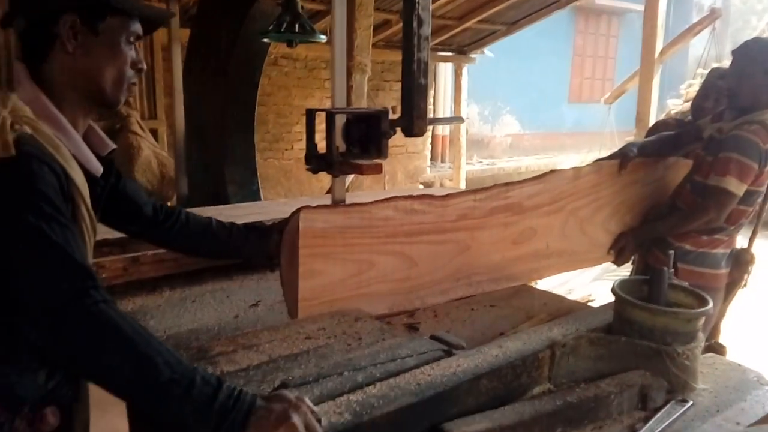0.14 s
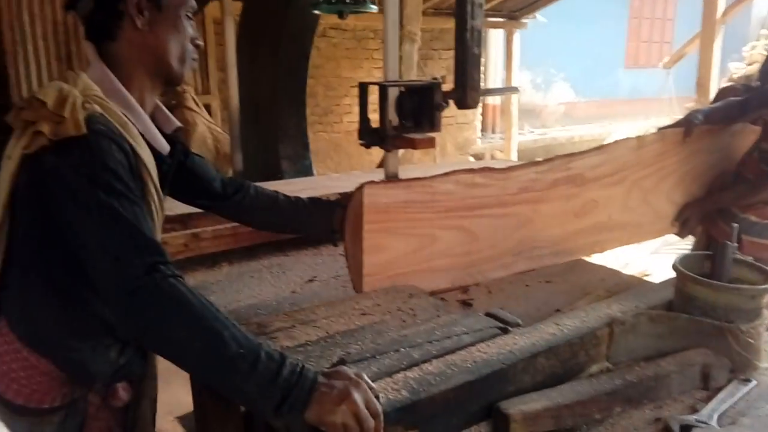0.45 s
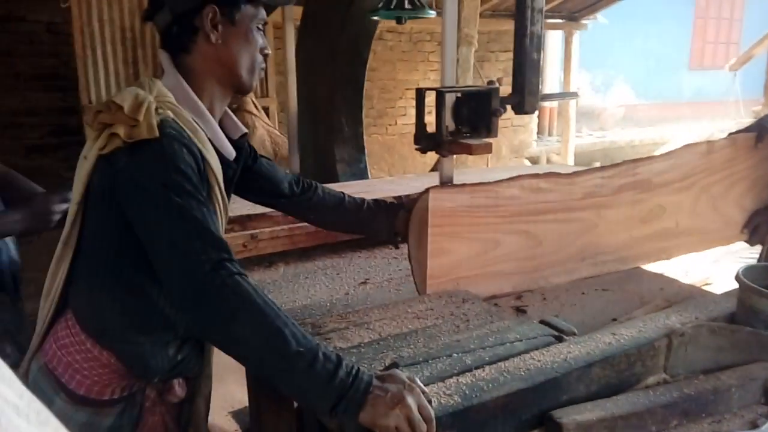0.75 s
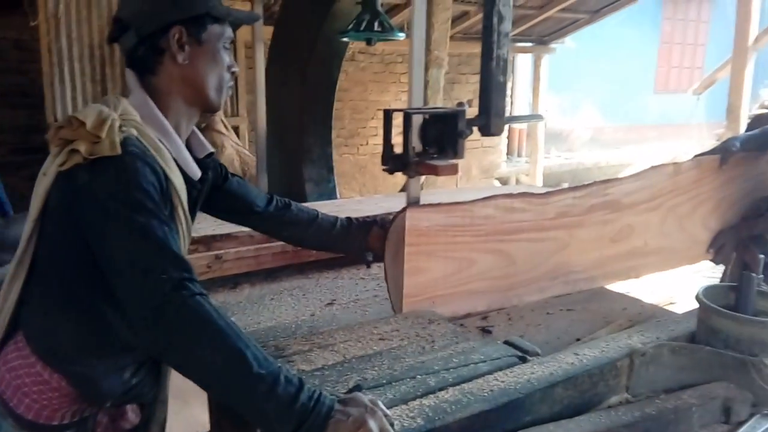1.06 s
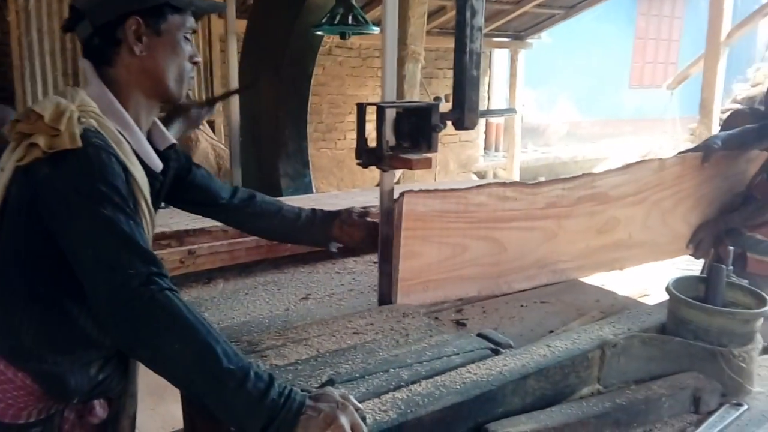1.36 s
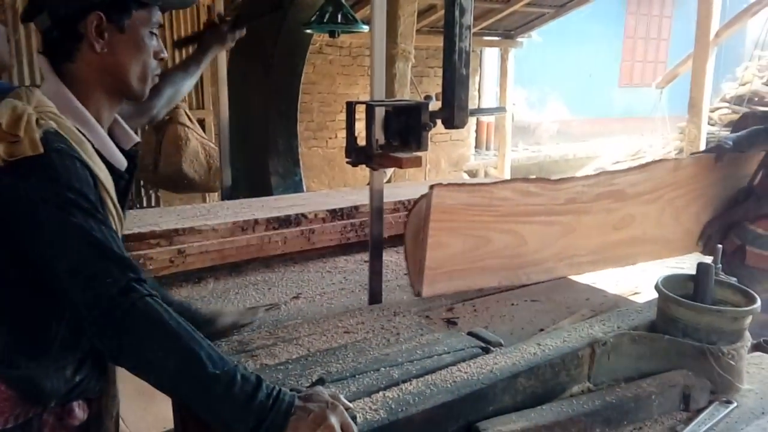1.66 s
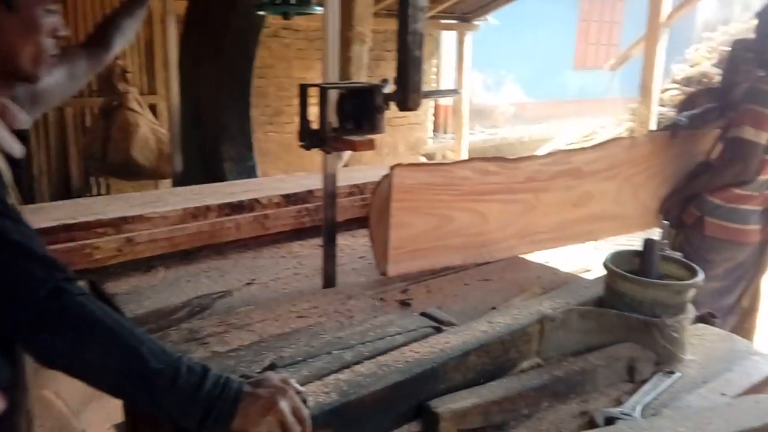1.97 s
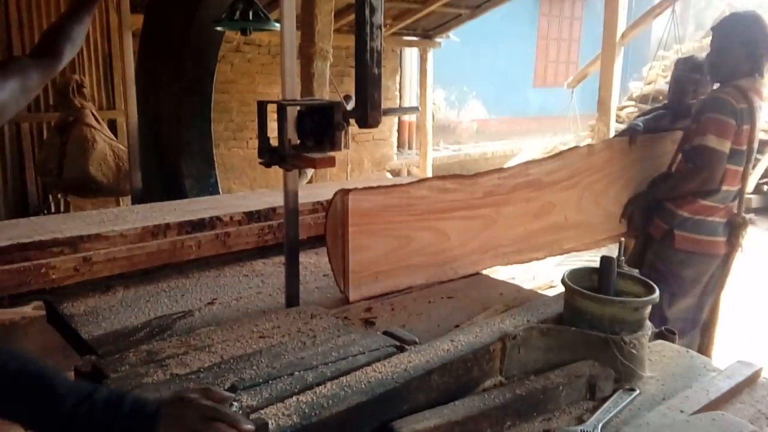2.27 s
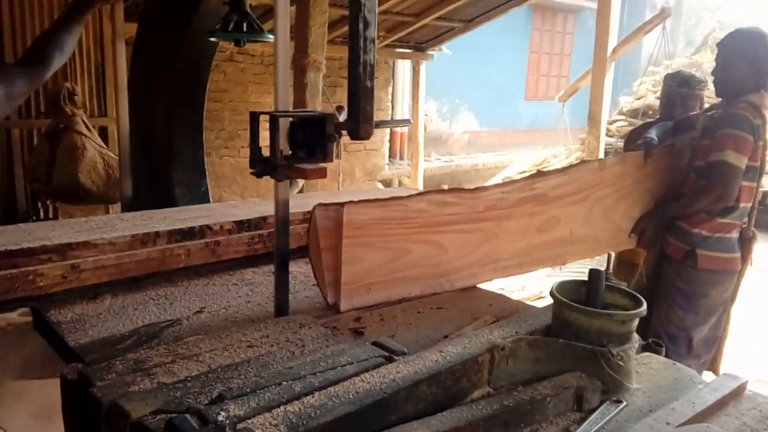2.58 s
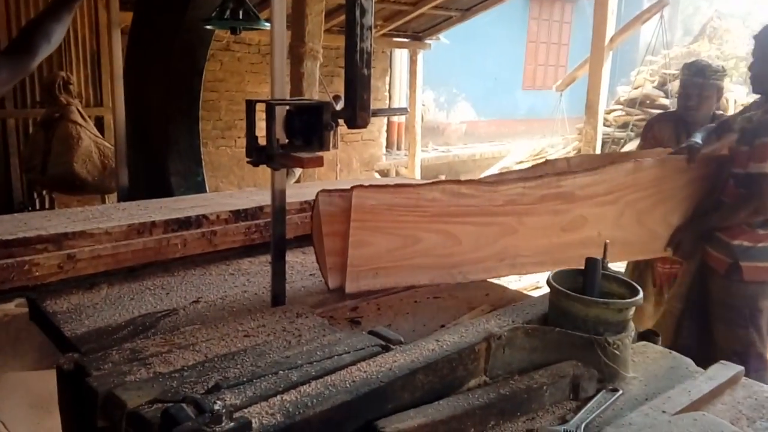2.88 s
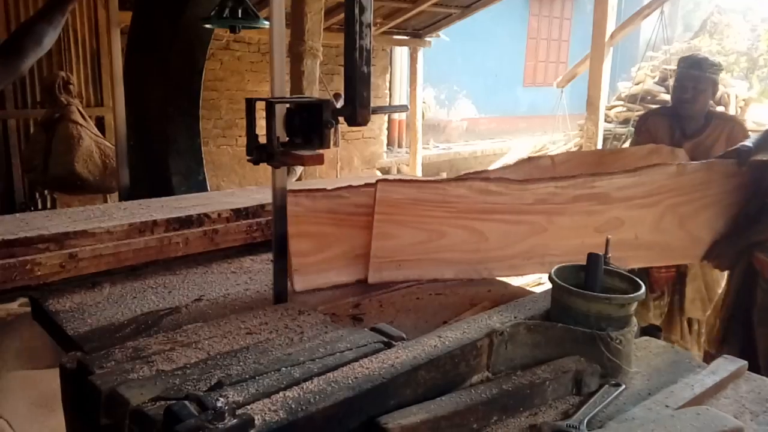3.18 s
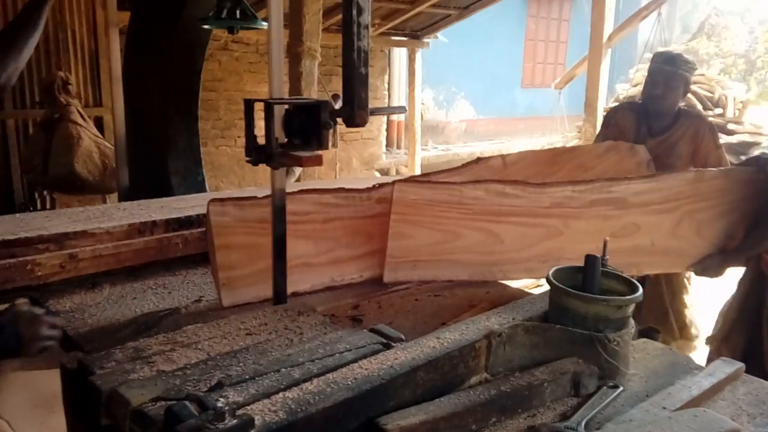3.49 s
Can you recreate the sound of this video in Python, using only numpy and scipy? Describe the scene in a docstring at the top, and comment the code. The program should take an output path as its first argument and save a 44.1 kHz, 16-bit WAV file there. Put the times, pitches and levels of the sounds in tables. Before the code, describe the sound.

Band saw close by: steady bright metallic hiss and wavering high whine, with sawdust fizz stopping early.

```python
"""In an open sawmill shed, a large band saw runs close by. Its steel band scrapes through the guides with a loud hiss,
made of shaped noise, and rings in narrow whines (narrow bands of noise) and wavering notes (sine tones).
Until 1.3 s the teeth rip a slab: this adds sawdust fizz and a low drone, and damps some of the ringing while it
strengthens other parts. Then the band runs nearly free: a slight bite creeps in, peaks at 3.2 s and soon ends."""
import sys
import numpy as np
from scipy import signal
from scipy.fft import rfft, irfft, next_fast_len
from scipy.io import wavfile
from scipy.ndimage import uniform_filter1d, map_coordinates

SR = 44100
rng = np.random.default_rng(int(sys.argv[2]) if len(sys.argv) > 2 else 0)


def digitize_waveform(pressure):
    """Quantize a signal to 16-bit integers and store it at the path in sys.argv[1].

    Rows of a 2-D input are taken as channels; values are limited to [-1, 1].
    """
    field = np.atleast_2d(pressure).T
    bounded = np.clip(field, -1, 1)
    quanta = np.round(bounded * 32767).astype(np.int16)
    wavfile.write(sys.argv[1], SR, quanta)


N = 160965  # samples, about 3.65 s


def amp(db):
    """Turn decibels into a plain multiplier."""
    return 10 ** (np.asarray(db) / 20)


def unit(x):
    """Scale a signal to an average strength (rms) of 1."""
    return x / np.sqrt(np.mean(x ** 2) + 1e-20)


def curve(rows):
    """Join (time, value) points with straight lines, one value per sample."""
    return np.interp(np.arange(N) / SR, *np.transpose(rows))


def wobble(rate):
    """A smooth random curve through rate random points a second."""
    return map_coordinates(rng.standard_normal(1024), [np.arange(N) * rate / SR], mode="wrap")


def filtered(x, response):
    """Make each frequency of x stronger or weaker, as the response says."""
    padded = next_fast_len(N + 8192)  # silence at the end keeps the filter's tail off the start
    spectrum = rfft(x, padded) * response(np.fft.rfftfreq(padded, 1 / SR))
    return irfft(spectrum, padded)[:N]


def noise(spectrum, patchy_db):
    """Noise of rms 1 with a given spectrum and narrow, brief patches of random loudness."""
    grid = signal.stft(rng.standard_normal(N), nperseg=2048)[2]
    patches = uniform_filter1d(rng.standard_normal(grid.shape), size=3, axis=0)  # spread over pitch
    patches = uniform_filter1d(patches, size=4, axis=1)  # spread over time
    patchy = signal.istft(grid * amp(patchy_db * unit(patches)), nperseg=2048)[1][:N]
    f, db = np.transpose(spectrum)
    return unit(filtered(patchy, lambda hz: amp(np.interp(np.log(hz + 1), np.log(f), db))))


def ringing(hz, width_hz):
    """A resonance kept ringing by friction: a narrow band of noise, rms 1."""
    def response(f):
        return 1 / (1 + 1j * (f - hz) / (.75 * width_hz)) ** 2
    return unit(filtered(rng.standard_normal(N), response))


def note(hz, waver_hz):
    """A nearly pure tone of rms 1 whose pitch wavers."""
    pitch_hz = hz + waver_hz * wobble(50)
    turns = np.cumsum(pitch_hz) / SR + rng.random()  # starts at a random point of its cycle
    return np.sqrt(2) * np.sin(2 * np.pi * turns)


# How loudly the band scrapes in the guides, before HISS_DB is added. Columns: t/s, level/dB
SCRAPE_LEVEL = [(0.03, -14.5), (1.5, -15.5), (1.73, -14), (2.21, -14.5), (2.24, -17.5), (2.27, -15),
                (3.56, -14), (3.62, -14.5)]
# Colour of the bright hiss. Columns: f/Hz, level/dB (relative)
HISS_SPECTRUM = [(3100, -56), (3240, -30), (3320, -4.5), (3540, 0), (3800, -3), (4080, -2.5), (4750, -7),
                 (5500, -4), (6600, -4), (7700, -14), (8000, -16), (8700, -20.5), (9150, -20),
                 (10000, -25.5), (11700, -33), (12800, -35.5), (13850, -43), (14700, -38), (15700, -40)]
HISS_DB = -0.68
CHATTER_DB, CHATTER_RATE = 0.55, 36  # quick unevenness of the scraping (dB, random points per s)


def guide_hiss():
    """The band scrapes through its guides, and the friction makes a bright, uneven hiss."""
    chatter_db = CHATTER_DB * wobble(CHATTER_RATE)
    return amp(curve(SCRAPE_LEVEL) + HISS_DB + chatter_db) * noise(HISS_SPECTRUM, patchy_db=2.0)


# Colour of the broad rush under the hiss. Columns: f/Hz, level/dB (relative)
RUSH_SPECTRUM = [(215, -53), (255, -20.5), (420, -16), (500, -2), (800, -3), (1100, 1), (1600, -1),
                 (2080, 4), (2450, 0.5), (3200, 1.5), (4500, -31), (8000, -44)]
RUSH_DB, RUSH_BITE_DB = -25, 0.5  # level running free, rise at full bite


def guide_rush(bite):
    """The scraping also makes a broad, lower rush that grows a little in the cut."""
    level_db = RUSH_DB + RUSH_BITE_DB * bite + 0.19 * wobble(14)
    return amp(level_db) * noise(RUSH_SPECTRUM, patchy_db=2.0)


# How loud the high, piercing ring is. Columns: t/s, level/dB
RING_LEVEL = [(.03, -21.5), (.25, -17), (.45, -23), (.7, -25.5), (.95, -17.5), (1.06, -27), (1.15, -22.5),
              (1.45, -19.5), (1.72, -17), (1.9, -20), (2.4, -20.5), (2.62, -23), (2.9, -20), (3.2, -20),
              (3.48, -18), (3.62, -24)]
# Resonances that make up the ring. Columns: f/Hz, width/Hz, level/dB (added to the curve)
RING_MODES = [(3325, 48, -8.5), (3395, 55, -6), (3440, 110, -7)]


def piercing_ring():
    """Close-set high resonances of the steel band ring together."""
    modes = sum(amp(db) * ringing(hz, width) for hz, width, db in RING_MODES)
    return amp(curve(RING_LEVEL)) * modes


# How loud the band's mid whine is. Columns: t/s, level/dB
WHINE_LEVEL = [(0.03, -27.5), (0.27, -26.5), (0.44, -39), (0.48, -27), (1.4, -26), (1.5, -33.5),
               (1.62, -21.5), (1.69, -31.5), (1.81, -27), (2.5, -29.5), (2.55, -23), (2.57, -29),
               (2.64, -25.5), (2.81, -31.5), (3.14, -25.5), (3.2, -42), (3.3, -23.5), (3.62, -29.5)]
# Resonances that make up the whine. Columns: f/Hz, width/Hz, level/dB (added to the curve)
WHINE_MODES = [(1213, 17.3, -6), (1267.7, 34, -3), (1348, 58, -7.5)]


def mid_whine():
    """Close-set middle resonances of the steel band whine together."""
    modes = sum(amp(db) * ringing(hz, width) for hz, width, db in WHINE_MODES)
    return amp(curve(WHINE_LEVEL)) * modes


# Brief squeals of the band in its guides.
# Columns: t/s (middle), length/s, f/Hz, waver/Hz, level/dB (at the peak)
SQUEALS = [(.08, 0.24, 5630, 35, -25), (.34, 0.14, 5615, 14, -23.5), (.55, 0.35, 5700, 46, -25),
           (1.4, 0.13, 949, 5.8, -27), (1.86, 0.086, 6990, 17, -28), (3.24, 0.13, 3880, 9.5, -27)]


def squeals():
    """Now and then the band catches and one note swells and fades."""
    t = np.arange(N) / SR
    total = np.zeros(N)
    for middle, length, hz, waver, db in SQUEALS:
        progress = np.clip((t - middle) / length, -.5, .5)
        swell = np.cos(np.pi * progress)  # 0 at both ends, 1 in the middle
        total += amp(db) * swell * note(hz, waver)
    return total


# Other resonances of band and frame.
# Columns: f/Hz, width/Hz, level/dB (running free), change/dB (at full bite)
BODY_MODES = [(303, 51, -64.5, 5.5), (407, 32, -54, 0), (505.4, 45, -46.5, -10), (562, 51, -41.5, -5),
              (949, 28, -42, -1), (1154.6, 27, -33.5, 2.5), (1861, 91, -37.5, -1.5), (2208, 62, -34, -4.5),
              (2795, 76, -40.5, 2), (4025, 62, -31, -11), (4287, 150, -37, -2), (9100, 120, -43, 4.5)]


def band_and_frame(bite):
    """Band and frame ring unsteadily; wood in the cut damps some resonances and drives others."""
    total = np.zeros(N)
    for hz, width, db, bite_db in BODY_MODES:
        level_db = db + bite_db * bite + .6 * wobble(6.8)
        total += amp(level_db) * ringing(hz, width)
    return total


# Nearly pure notes that the band sings.
# Columns: f/Hz, waver/Hz, level/dB (running free), change/dB (at full bite)
BAND_NOTES = [(579, 6, -50, 6), (1157, 5, -41.5, 6), (1420, 4, -53, 9), (1498, 6, -50, -1),
              (2204, 14, -43, -4)]
NOTE_FLUTTER_DB, NOTE_FLUTTER_RATE = 4, 16  # (dB, random points per s)


def singing_notes(bite):
    """The steel sings fluttering notes; the cut strengthens some and weakens others."""
    total = np.zeros(N)
    for hz, waver, db, bite_db in BAND_NOTES:
        level_db = db + bite_db * bite + NOTE_FLUTTER_DB * wobble(NOTE_FLUTTER_RATE)
        total += amp(level_db) * note(hz, waver)
    return total


# How loud the band's hum is, strongest after the cut. Columns: t/s, level/dB
HUM_LEVEL = [(0, -57), (.65, -43.5), (1.3, -45), (1.37, -42), (1.62, -48), (1.73, -34.5), (1.87, -42.5),
             (2.05, -37.5), (2.65, -43.5), (3.05, -38.5), (3.35, -40.5), (3.48, -46.5), (3.65, -41)]
HUM_HZ, HUM_WAVER_HZ = 487.4, 3.9


def band_hum():
    """The band hums one wavering note that swells and sinks."""
    return amp(curve(HUM_LEVEL) + 1.3 * wobble(18)) * note(HUM_HZ, HUM_WAVER_HZ)


# Colour of the sawdust fizz. Columns: f/Hz, level/dB (relative)
DUST_SPECTRUM = [(2000, -23), (5000, 5), (7000, 6), (8200, 3), (8700, -5), (9200, 2.5), (10000, -7.5),
                 (11700, -13.5), (12800, -15), (13850, -23), (14800, -14), (15700, -14)]
DUST_DB = -24.5  # at full bite


def sawdust(bite):
    """The teeth throw out sawdust, a high fizz that follows the bite."""
    return amp(DUST_DB + 0.64 * wobble(58)) * bite * noise(DUST_SPECTRUM, patchy_db=-2.0)


# How loud the slab's low drone is. Columns: t/s, level/dB
DRONE_LEVEL = [(0, -76), (.25, -72), (.31, -59), (.38, -74), (.49, -56), (.65, -75), (.74, -55), (.9, -50),
               (.98, -55), (1.04, -71), (1.11, -55), (1.24, -60), (1.33, -74), (3.65, -73)]
DRONE_HZ, DRONE_WAVER_HZ = 150, 2.3
SLAB_HZ, SLAB_WIDTH_HZ, SLAB_DB = 112, 27, -61.5  # lowest resonance, level at full bite


def slab(bite):
    """The teeth shake the slab's lowest resonance, and the slab drones in swells."""
    shaking = amp(SLAB_DB) * bite * ringing(SLAB_HZ, SLAB_WIDTH_HZ)
    drone = amp(curve(DRONE_LEVEL)) * note(DRONE_HZ, DRONE_WAVER_HZ)
    return shaking + drone


# Colour of the rumble of the wheels. Columns: f/Hz, level/dB (relative)
RUMBLE_SPECTRUM = [(20, -9), (35, -10), (50, -8), (75, -3), (110, -3), (150, 2.5), (185, -8), (220, -19),
                   (500, -22)]
RUMBLE_DB = -60
MOTOR_HZ, MOTOR_DB = 49.5, -70


def wheels():
    """The wheels rumble faintly as low noise, and their motor hums one low note."""
    rumble = amp(RUMBLE_DB) * noise(RUMBLE_SPECTRUM, patchy_db=-2.5)
    return rumble + amp(MOTOR_DB) * note(MOTOR_HZ, .5)


# How hard the teeth bite into the slab. Columns: t/s, load (0 to 1)
BITE_LOAD = [(0, 0.5), (.65, 0.78), (.73, 1), (1.295, 1), (1.315, 0), (3.2, 0.09), (3.35, 0), (3.65, 0)]


def scene():
    """The whole saw, the same in both ears."""
    bite = np.clip(curve(BITE_LOAD), 0, 1)
    scraping = guide_hiss() + guide_rush(bite)
    steel = piercing_ring() + mid_whine() + squeals()
    steel += band_and_frame(bite) + singing_notes(bite) + band_hum()
    wood = sawdust(bite) + slab(bite)
    saw = scraping + steel + wood + wheels()
    return np.array([saw, saw])


CEILING, KNEE = .92, 10  # peak limit (full scale is 1), sharpness of the rounding
TOP_HZ = 15750


def record(dry):
    """Round off the very highest peaks, then keep only what lies below TOP_HZ."""
    rounded = dry / (1 + np.abs(dry / CEILING) ** KNEE) ** (1 / KNEE)
    return np.array([filtered(x, lambda hz: hz < TOP_HZ) for x in rounded])


dry = scene()
out = record(dry)
digitize_waveform(out)
```